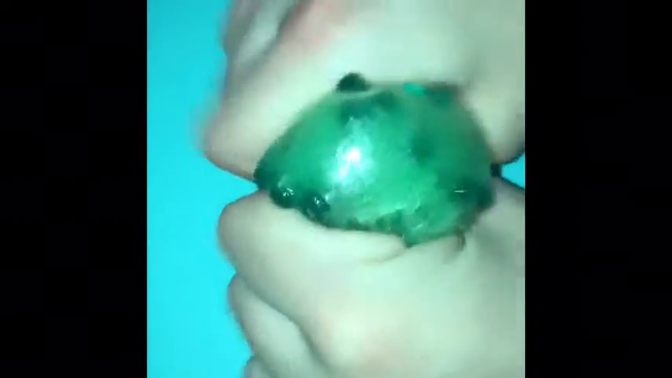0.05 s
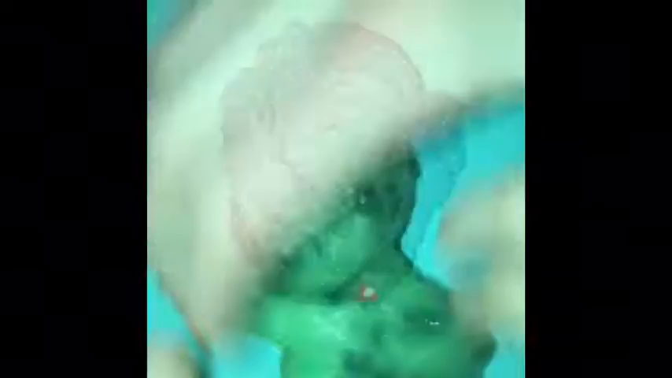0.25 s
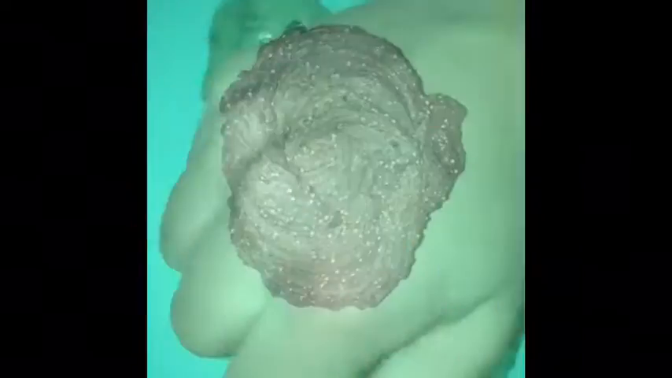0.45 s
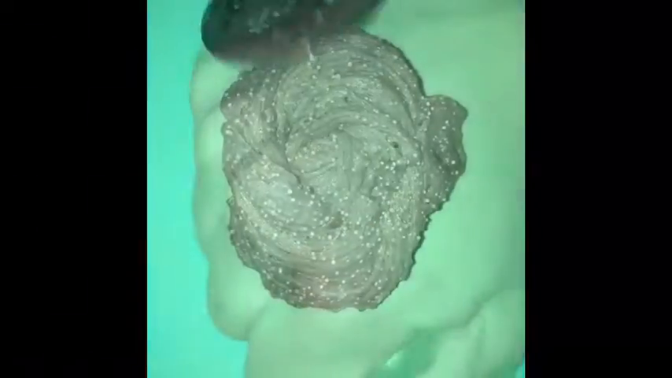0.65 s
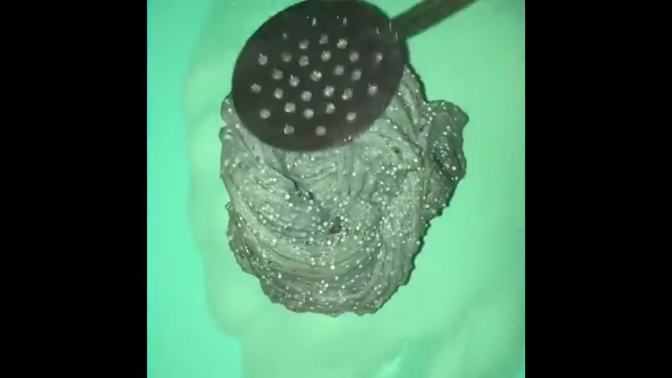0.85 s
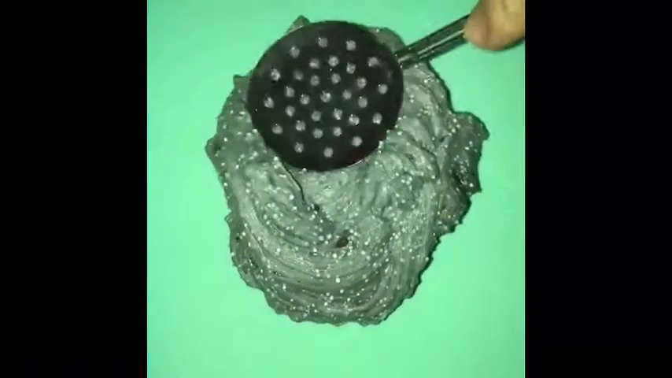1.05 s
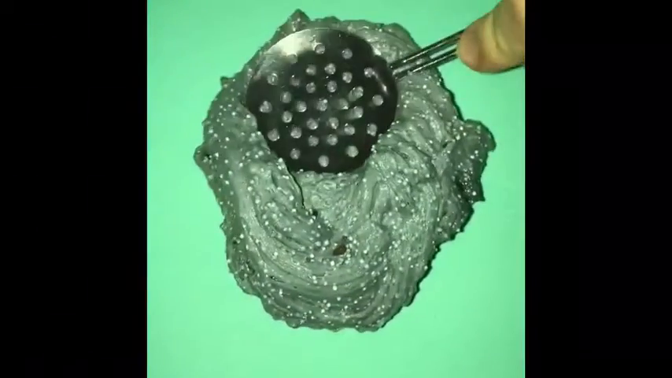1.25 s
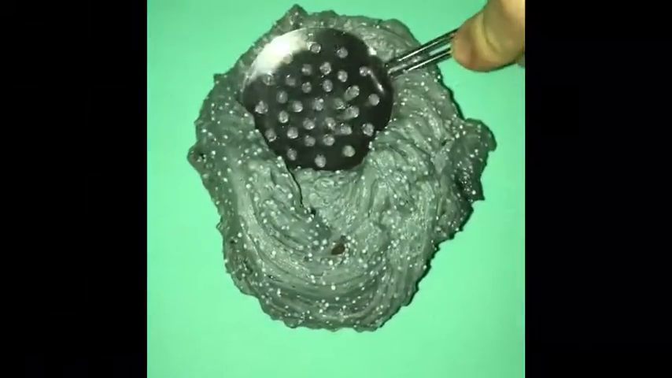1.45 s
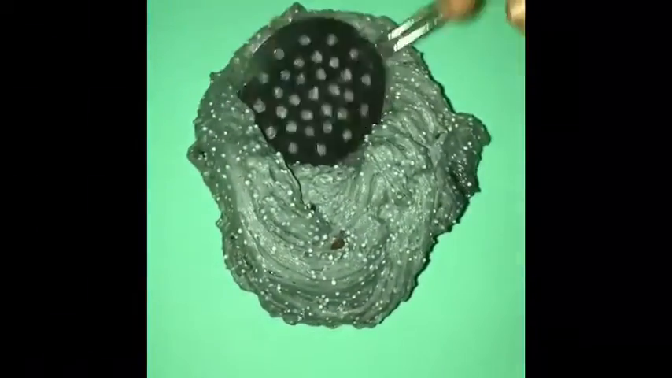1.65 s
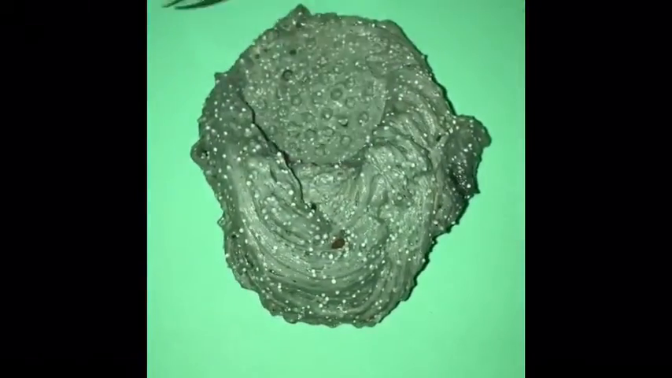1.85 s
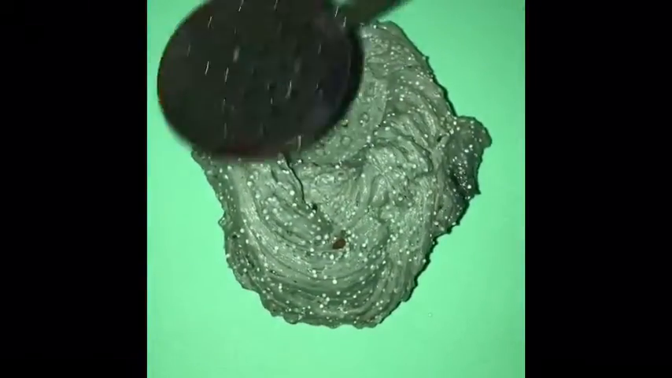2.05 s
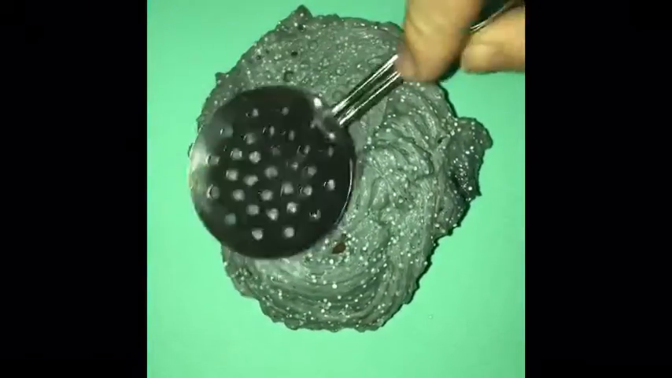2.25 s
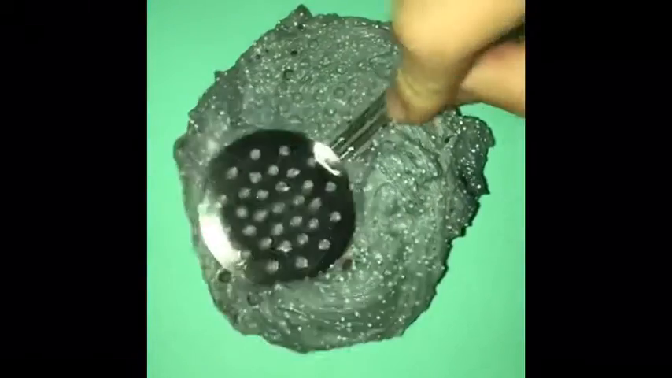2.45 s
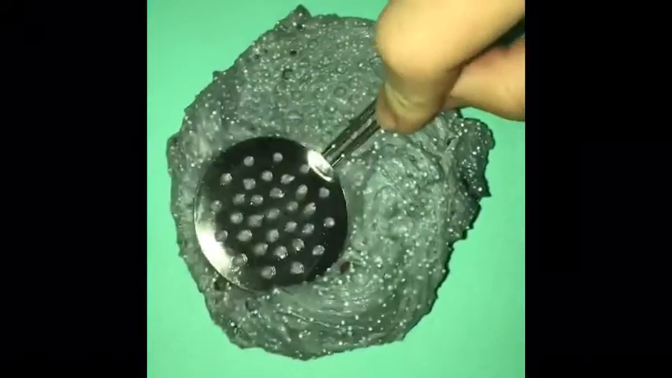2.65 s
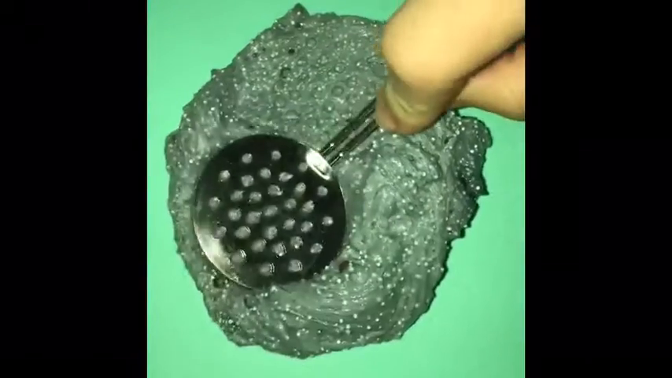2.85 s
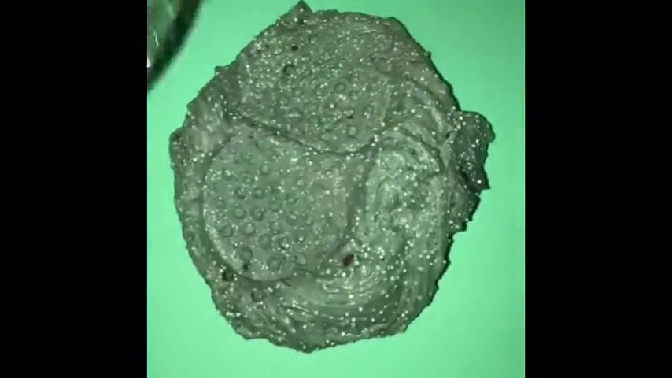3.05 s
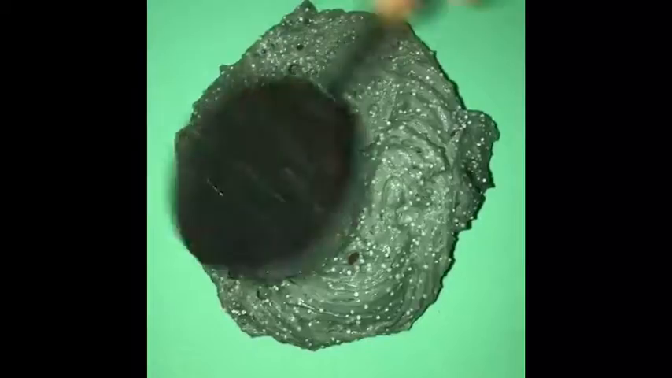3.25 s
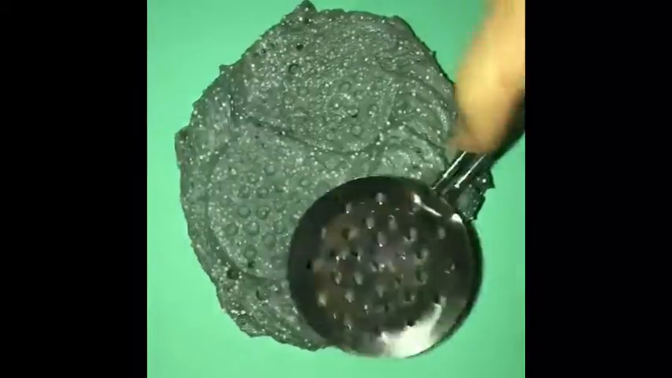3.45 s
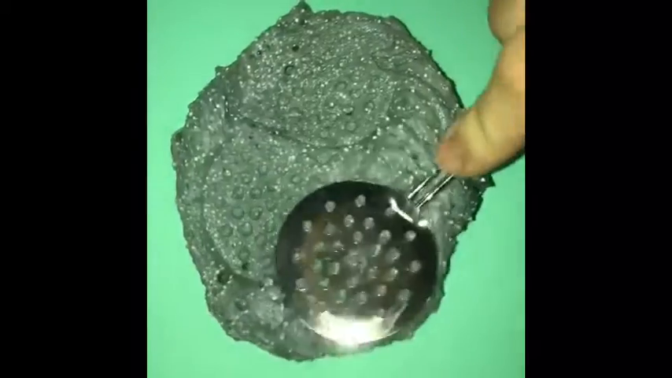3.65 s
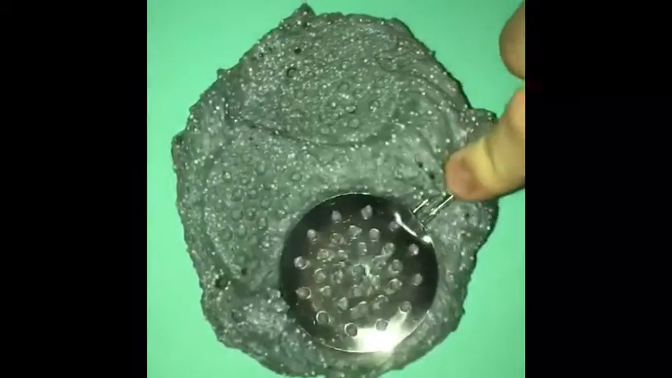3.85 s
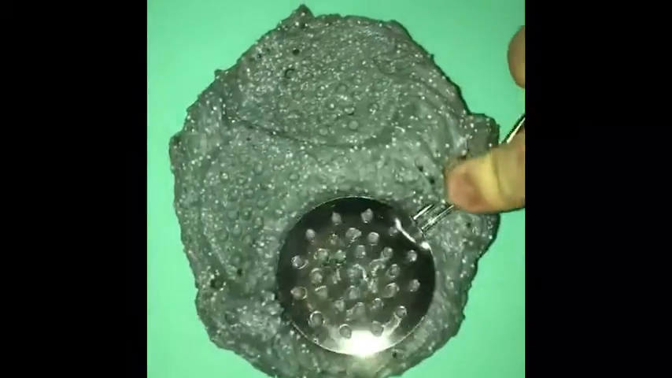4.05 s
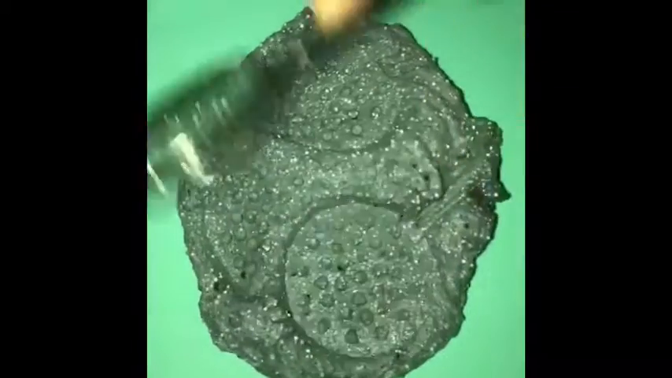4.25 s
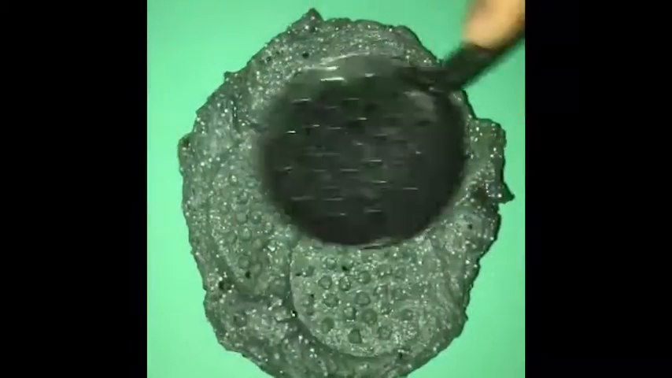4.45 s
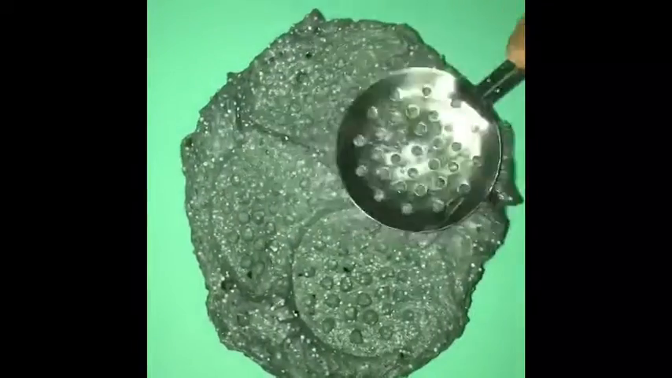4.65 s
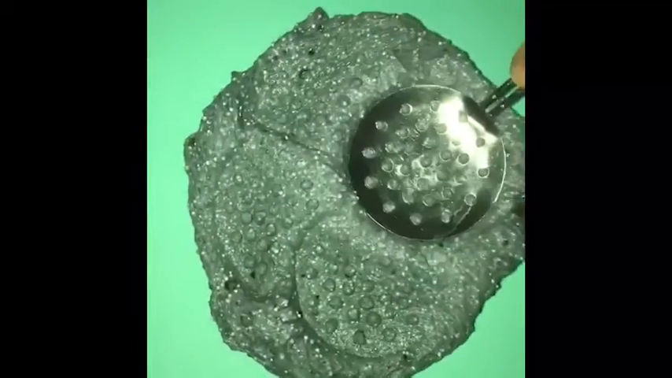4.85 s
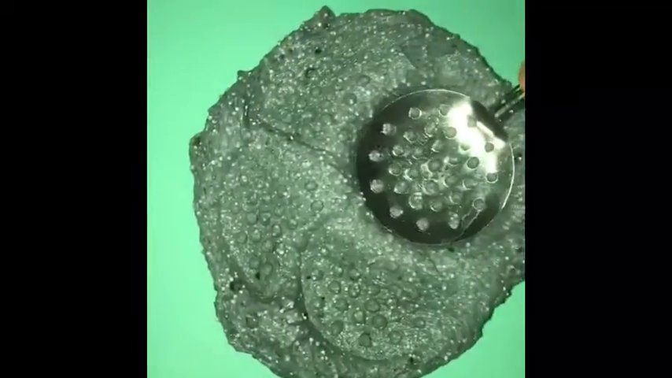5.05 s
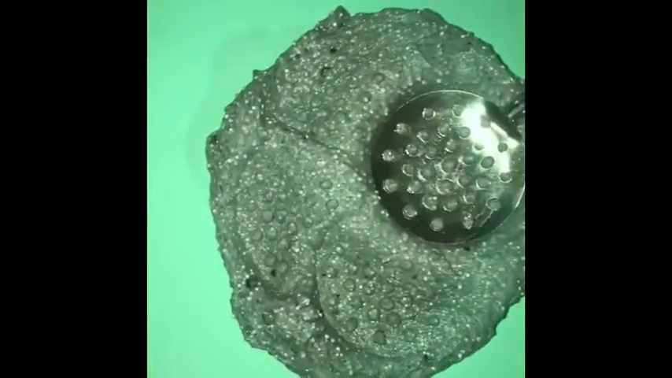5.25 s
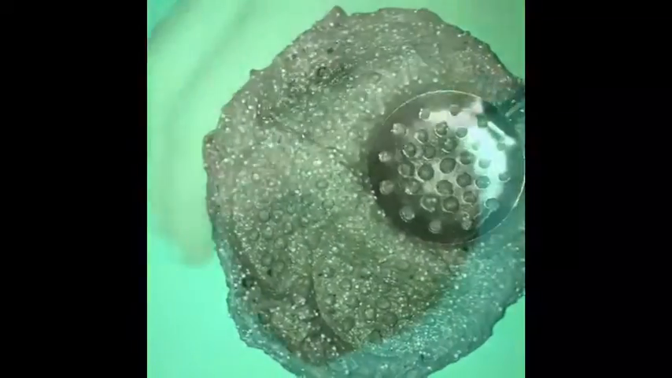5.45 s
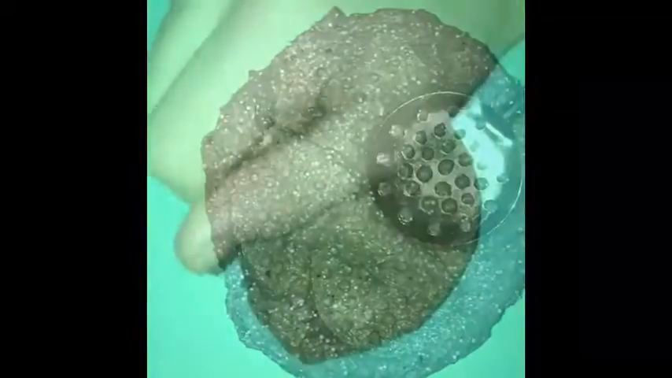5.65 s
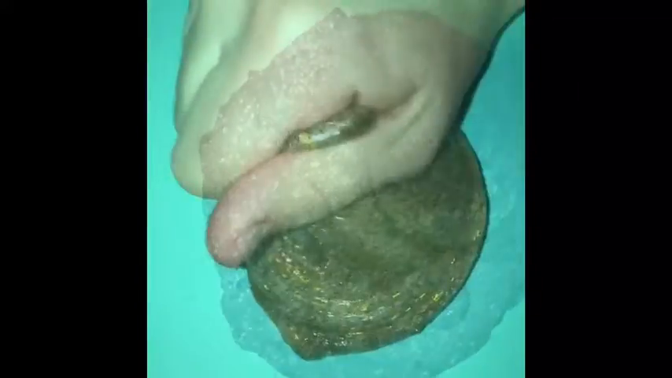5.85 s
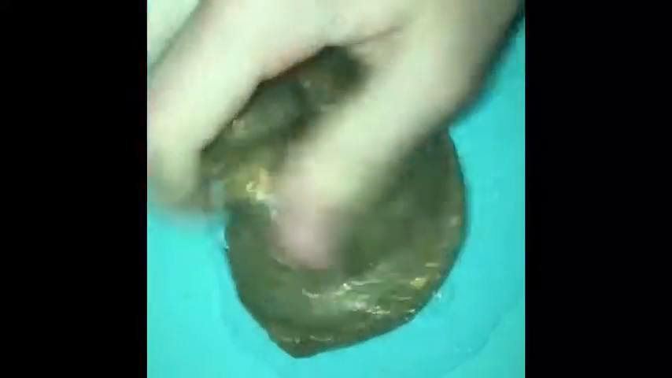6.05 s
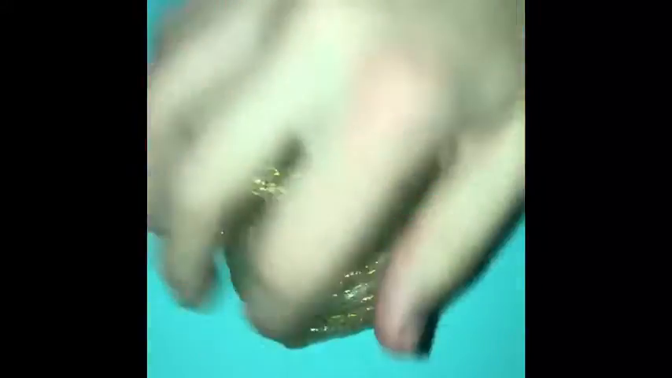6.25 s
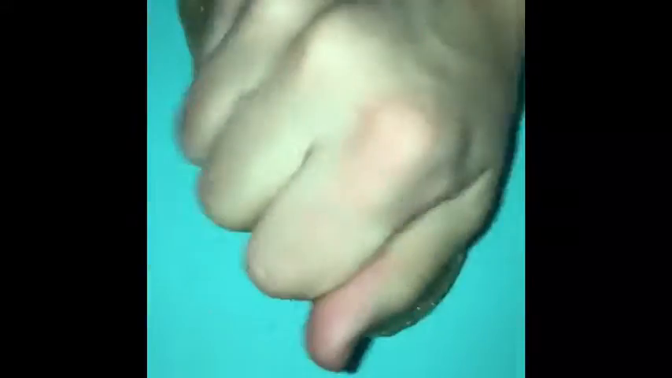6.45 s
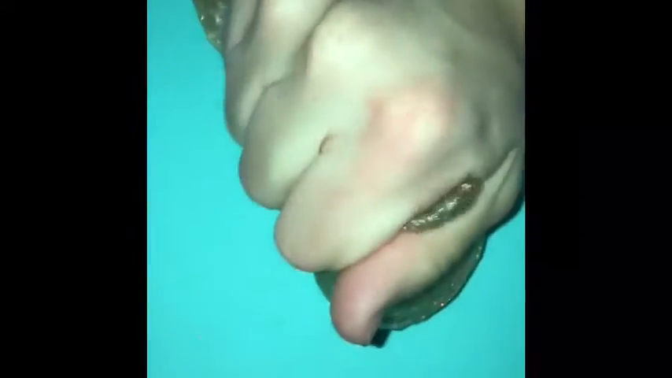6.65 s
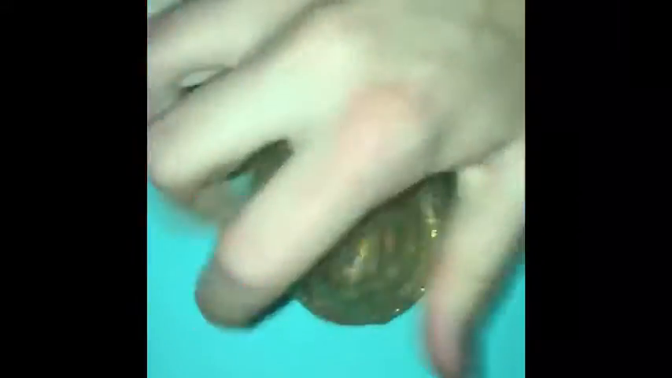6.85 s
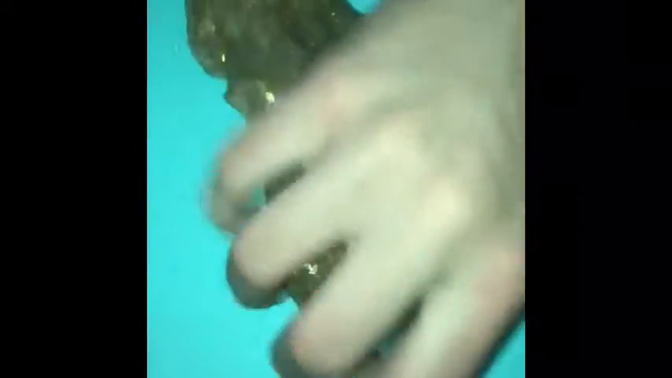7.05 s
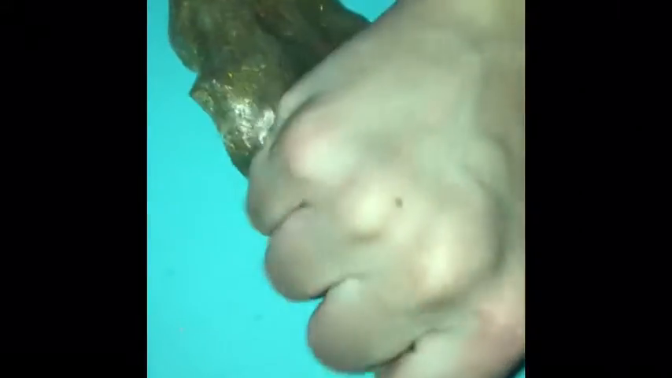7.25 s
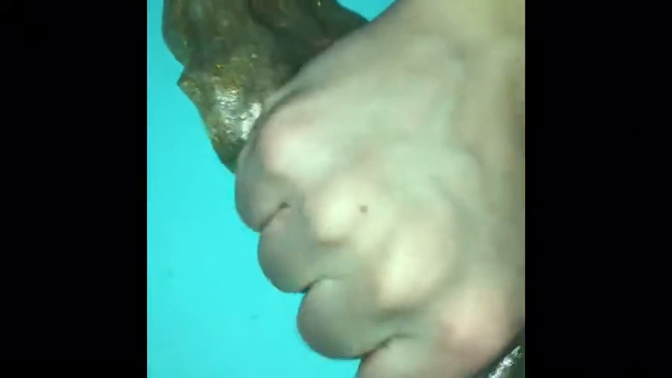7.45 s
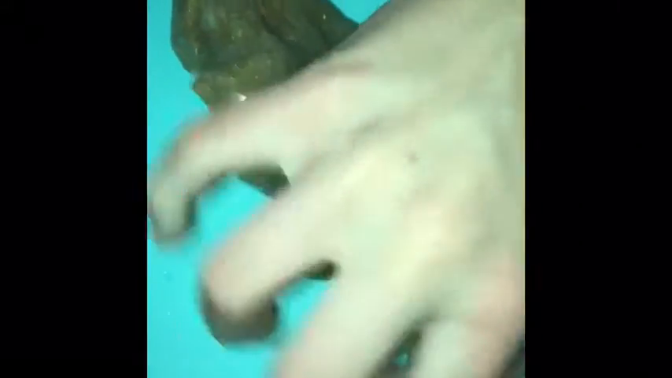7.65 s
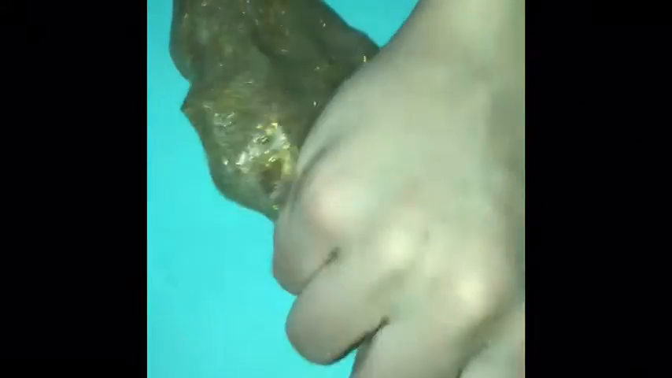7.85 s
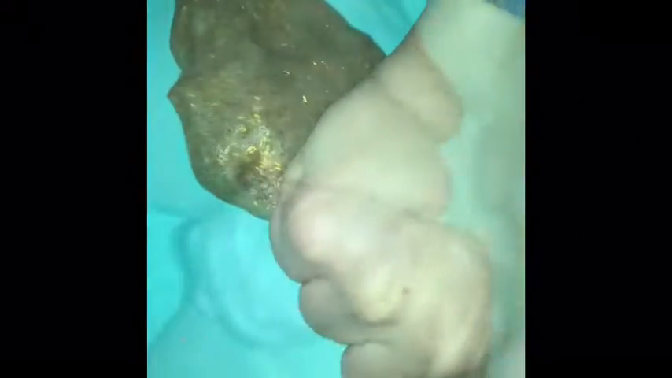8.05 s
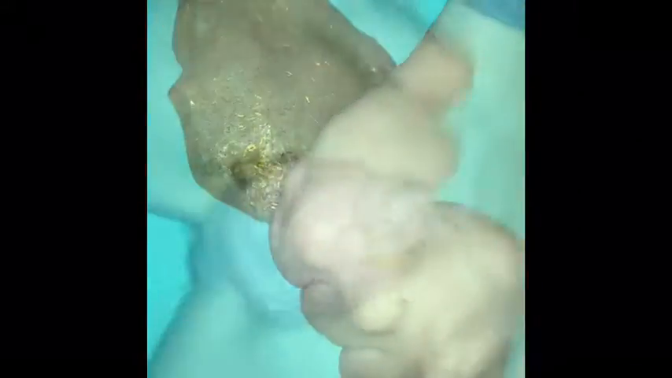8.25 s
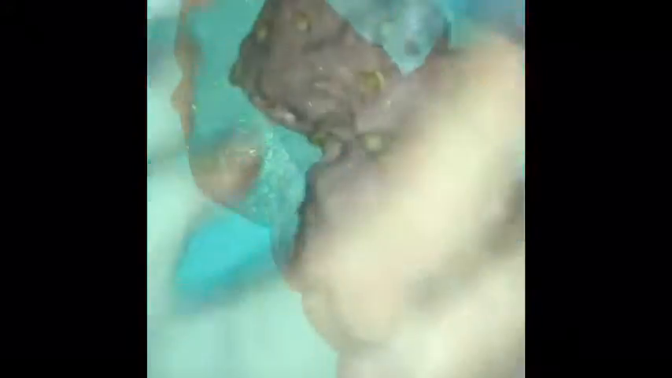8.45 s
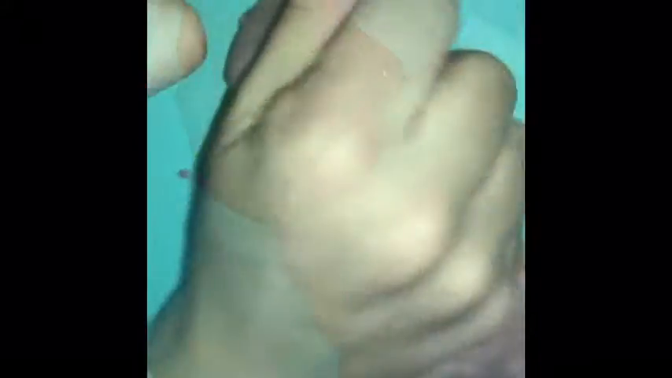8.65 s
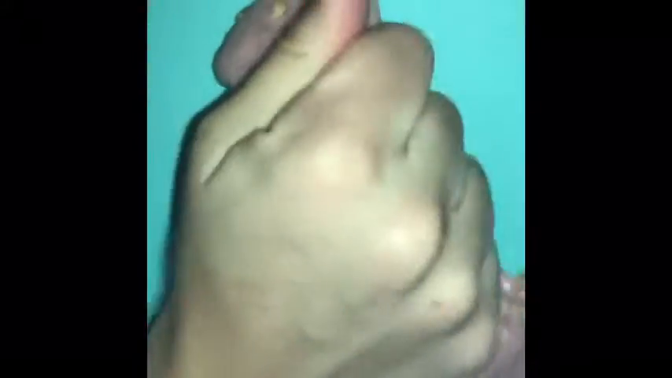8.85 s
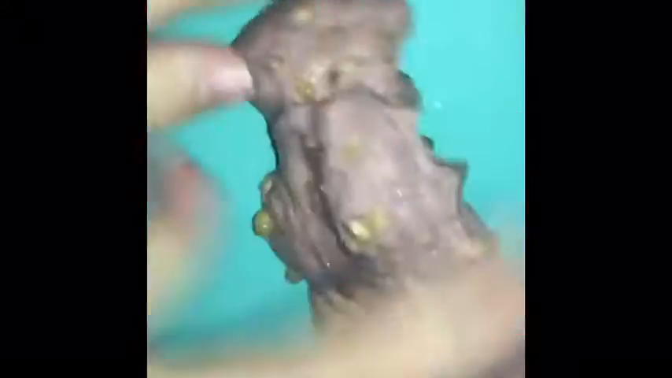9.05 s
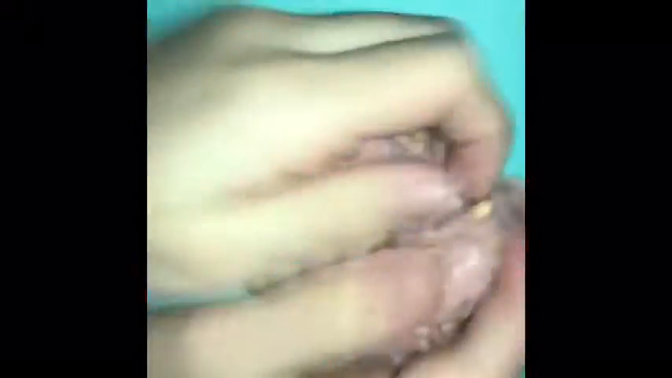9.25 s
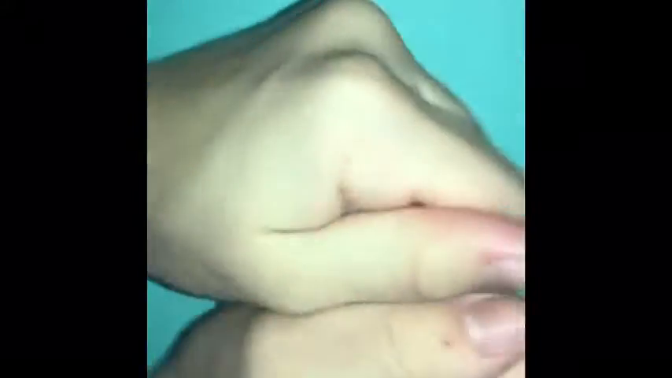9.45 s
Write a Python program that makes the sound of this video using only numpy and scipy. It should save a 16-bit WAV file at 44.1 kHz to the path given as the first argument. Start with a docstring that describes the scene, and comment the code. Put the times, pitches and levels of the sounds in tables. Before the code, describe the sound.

Very close in a small quiet room, a fist crushes bubbly slime with sharp pops and a squelch. A perforated spoon then presses in four times, each a faint fizz; the first three end in a short sticky rip and smack. Finally hands knead the slime, giving loud bunches of crisp snaps, wet squelches and low soft thuds, with quieter peeling between squeezes.

```python
"""A fist crushes crunchy slime close up, with a squelch and sharp pops, then its fingers peel off.
A perforated metal spoon is pressed in four times, then the slime is kneaded again.
Pops are short bursts of noise, fizz and crackle are crowds of tiny bursts, and squelches are sputtering air
in ringing hollows. The spoon fizzes softly as it sinks in and rips with a short smack as it is pulled off.
Low thuds and rumble of the handling and the faint air of a small, quiet room lie beneath."""
import sys
import numpy as np
from scipy import signal
from scipy.fft import rfft, irfft
from scipy.io import wavfile

SR = 44100
rng = np.random.default_rng(int(sys.argv[2]) if len(sys.argv) > 2 else 0)


def log_audio(samples):
    """Write samples as a 16-bit WAV file to the path given in sys.argv[1]."""
    # one column per channel
    frames = np.atleast_2d(samples).T
    # limit to full scale, then quantise
    limited = np.clip(frames, -1, 1)
    pcm = np.round(limited * 32767).astype(np.int16)
    wavfile.write(sys.argv[1], SR, pcm)


N = 418950
TIME = np.arange(N) / SR
EDGE_HZ = 16100  # top of the band that is kept


def amp(db):
    """Decibels to gain."""
    return 10 ** (np.asarray(db) / 20)


def unit(x):
    """Scales to rms 1."""
    return x / np.sqrt(np.mean(x ** 2) + 1e-20)


def level(rows):
    """Gain at every sample, drawn as straight lines in dB between (seconds, dB) rows."""
    return amp(np.interp(TIME, *np.transpose(rows)))


def add(mix, s, sound):
    """Mixes a sound in at time s in seconds."""
    part = mix[max(round(s * SR), 0):][:len(sound)]
    part += sound[:len(part)]


def colour(x, points):
    """Filters x by the curve through (Hz, dB) points, then scales it to rms 1."""
    hz, db = np.transpose(points)
    bins = np.fft.rfftfreq(N, 1 / SR)
    gain = amp(np.interp(np.log(bins + 1), np.log(hz), db))
    return unit(irfft(rfft(x) * gain, N))


def grains(per_s, spread_db):
    """Random tiny clicks, mostly small with a few large ones; rms 1."""
    size = amp(spread_db * np.minimum(rng.exponential(1, N), 4.5))
    sign = rng.choice([-1, 1], N)
    present = rng.random(N) < per_s / SR
    return unit(size * sign * present)


def swell(start, peak, end, ends_db, shape):
    """Gain that is 1 at the peak and normally ends_db lower at start and end, with faint tails beyond."""
    before = (peak - TIME) / max(peak - start, .002)
    after = (TIME - peak) / max(end - peak, .002)
    away = np.maximum(before, after)
    return amp(-ends_db * away ** shape) * (away < 2)


def cavity(x, hz, width_hz):
    """A soft hollow ringing at hz (which may glide), with steep skirts; rms 1."""
    turn = np.exp(2j * np.pi * np.cumsum(hz * np.ones(len(x))) / SR)
    # shift the ringing pitch down to zero, smooth, then shift it back up
    smooth = signal.lfilter(*signal.butter(2, width_hz / 2, fs=SR), x / turn)
    return unit((turn * smooth).real)


def burst(hz, tear_ms, ragged, ring_ms, ring_db, build=0.16, size=1024):
    """One bubble: the film starts to tear, snaps after 1 ms, and the open pocket rings for a moment."""
    ms = (np.arange(size) - SR // 1000) / SR * 1000  # the snap is at zero
    tear, scatter = rng.standard_normal((2, size))
    torn = 1 - np.exp(-ragged * tear_ms)  # quick bursts are nearly all snap
    tear = tear * np.exp(-(ms / tear_ms / np.where(ms < 0, build, 1)) ** 2)
    snap = unit(1. * (ms == 0))
    drive = np.sqrt(1 - torn) * snap + np.sqrt(torn) * unit(tear)
    # the open pocket rings at four scattered pitches, roughened by noise
    modes = np.minimum(hz * np.exp(.55 * rng.standard_normal(size=(4, 1))), EDGE_HZ)
    ring = unit(np.sin(2 * np.pi * modes * TIME[:size]).sum(0)) + scatter
    drive += amp(ring_db) * unit(ring * np.exp(-ms / ring_ms) * (ms > 0))
    # each bubble colours its burst with a broad band around hz
    bins = abs(np.fft.fftfreq(size, 1 / SR)) + 20
    log_gain = 0.88 * np.log(bins / hz)
    log_gain -= .5 * np.log(1 + (bins / hz) ** 5)
    log_gain -= np.log(1 + (bins / EDGE_HZ) ** 20)
    band = np.exp(np.conj(signal.hilbert(log_gain)))  # minimum phase: the band adds no sound ahead of the drive
    return unit(np.fft.ifft(np.fft.fft(drive) * band).real) / np.sqrt(ms[-1])


# The colour of the room's own air. Each row: frequency in Hz, relative strength in dB.
AIR_COLOUR = [(20, -31), (40, -16.5), (56, 3), (80, -4), (130, -12), (300, -15), (600, -21.5),
              (2000, -28.5), (8000, -39.5), (16000, -35)]


def room_air(db=-63.5):
    """The steady, faint noise of the quiet room."""
    return amp(db) * colour(rng.standard_normal(N), AIR_COLOUR)


# How strongly the hands shift the mass on the table. Each row: time in seconds, level in dB.
HANDLING_LEVEL = [(0, -62.5), (.7, -75), (1, -74.5), (5.5, -76), (6.1, -56), (8.6, -60.5), (9.5, -52)]
# The colour of low pushes and thuds. Each row: frequency in Hz, relative strength in dB.
PUSH_COLOUR = [(20, -42), (64, -3), (120, -2.5), (280, -3.5), (500, -10), (1200, -32)]


def handling(thuds):
    """Low noise as the hands move the mass, and as lifted slime drops back."""
    return (level(HANDLING_LEVEL) + thuds) * colour(rng.standard_normal(N), PUSH_COLOUR)


# Air pushed through a fold. Each row: start, peak and end in seconds, level in dB, cavity pitch in Hz,
# pitch glide in octaves to either side of the peak, level of the low push in dB before its 2 dB cut.
FOLD_SQUELCHES = [(0, 0.003, 0.051, -36.5, 1890, -0.13, -68),
                  (0.173, 0.218, .32, -34.5, 1390, 0.00069, -47.5),
                  (0.514, 0.523, 0.56, -35, 1500, 0.044, -57), (0.6, .614, 0.65, -42.5, 2500, -0.14, -69),
                  (5.574, 5.65, 5.82, -52.5, 1350, .2, -62), (5.82, 5.818, 5.91, -31, 1700, 0.089, -52),
                  (5.84, 5.942, 6.06, -51, 1090, 0.18, -54), (6.201, 6.219, 6.28, -36, 1380, 0.074, -45),
                  (6.445, 6.45, 6.55, -50.5, 1200, -0.12, -48), (6.562, 6.579, 6.66, -26, 740, 0.15, -58),
                  (6.615, 6.623, 6.67, -37, 1090, -0.15, -50), (6.728, 6.735, 6.77, -36, 1130, -0, -41.5),
                  (6.884, 6.954, 7.19, -41.5, 1030, 0.096, -44.5),
                  (7.205, 7.245, 7.277, -26, 1340, .08, -52),
                  (7.234, 7.246, 7.32, -27.5, 4001, -0.053, -57),
                  (7.327, 7.366, 7.5, -34.5, 1920, 0.12, -47),
                  (7.657, 7.736, 7.79, -35.5, 1341, 0.77, -46.5),
                  (7.86, 7.873, 7.9, -33, 1339, -0.06, -35.5), (7.875, 7.93, 8.06, -37, 1260, -0.094, -64),
                  (7.985, 8.08, 8.28, -42.5, 2340, 0.22, -50.5), (8.31, 8.45, 8.52, -42.5, 1260, 0.44, -51),
                  (8.693, 8.797, 8.85, -37.5, 770, 0.074, -46), (8.97, 9.055, 9.17, -50.5, 1310, 0.19, -51),
                  (9.153, 9.205, 9.24, -38, 1550, -.35, -42.5), (9.208, 9.334, 9.55, -45.5, 1414, 0.2, -51)]
# The colour of a rustling fold. Each row: frequency in Hz, relative strength in dB.
FOLD_COLOUR = [(100, -33), (450, -5.5), (1000, 5), (2400, -4.5), (4000, -14.5), (12000, -36.5)]
SUCK_LEAD_S, SUCK_LAG_S, SUCK_END_S = 0.013, 0.0066, 0.068  # air rushes in under the spoon
SUCK_PUSH_DB = -19.5  # push of that air relative to the hollow, before the same cut


def squelches(width_hz=300, widening=.17, cavity_db=-2, upper_db=-15, fold_db=-8, push_db=-2,
              suck_glide=0.19, wobble=0.15, wobble_s=.009):
    """Sputtering air rings each fold, or the hollow under the spoon, as the mass thuds; also gives the airflow."""
    out, flow = np.zeros((2, N))
    sputter = grains(per_s=3000, spread_db=4.0)
    rustle = colour(grains(per_s=3000, spread_db=6.5), FOLD_COLOUR)
    push = colour(rng.standard_normal(N), PUSH_COLOUR)
    # the soft walls shake, so the pitch wavers
    drift = signal.fftconvolve(rng.standard_normal(N), np.hanning(int(2 * wobble_s * SR)), "same")
    trembling = 2 ** (wobble * unit(drift))
    sucks = [(s - SUCK_LEAD_S, s + SUCK_LAG_S, s + SUCK_END_S, db, hz, suck_glide, db + SUCK_PUSH_DB)
             for s, _, _, db, hz, _ in SPOON_PULLS]
    for start, peak, end, db, hz, glide, low_db in FOLD_SQUELCHES + sucks:
        air = swell(start, peak, end, ends_db=18.0, shape=1.4)
        now = air > 0
        # the pitch glides as the cavity shrinks or opens
        progress = np.tanh(2 * (TIME[now] - peak) / (end - start))
        pitch = hz * trembling[now] * 2 ** (glide * progress)
        third = 3 * pitch  # closed at one end, it also rings three times higher
        width = width_hz + widening * hz  # soft walls damp it heavily
        hollow = amp(cavity_db) * cavity(sputter[now], pitch, width)
        hollow += amp(upper_db) * cavity(sputter[now], third, 2 * width)
        fold = amp(db) * (hollow + amp(fold_db) * rustle[now])
        out[now] += air[now] * (fold + amp(low_db + push_db) * push[now])
        flow += air * amp(db)
    return out, flow


# The fist closes and crushes the foam. Each row: start, peak and end in seconds, crushing level in dB.
FIST_SQUEEZES = [(0, 0.014, .06, -37), (0.598, .7, 0.83, -53), (5.7, 5.83, 5.85, -42),
                 (5.888, 5.905, 6.04, -43.5), (6.515, 6.64, 6.78, -36), (7.306, 7.383, 7.553, -39),
                 (7.98, 8.12, 8.34, -39.5), (8.683, 8.835, 8.97, -37.5), (9.43, 9.5, 12.4, -39.5)]


def squeezing():
    """Crushing of the foam as the fist tightens and relaxes."""
    return sum(amp(db) * swell(start, peak, end, ends_db=17.5, shape=1.7)
               for start, peak, end, db in FIST_SQUEEZES)


# The foam keeps fizzing faintly as it settles. Each row: time in seconds, level in dB.
SETTLING_LEVEL = [(0, -55), (.9, -71.5), (2.1, -81), (4.27, -82.5), (4.33, -65), (4.68, -63.5), (4.8, -77),
                  (5.57, -76), (5.7, -72), (6.4, -69), (7.1, -64), (9.5, -73)]


def settling():
    """A faint, slowly changing fizz level between the louder events."""
    return level(SETTLING_LEVEL)


# The colour of crisp fizz. Each row: frequency in Hz, relative strength in dB.
CRISP_COLOUR = [(150, -29.5), (600, -10), (1200, -4.5), (2500, -6.5), (6000, -1.5), (9000, -1), (10500, -4),
                (12200, 1.5), (16000, -2.5)]
# The colour of dull, wet fizz. Each row: frequency in Hz, relative strength in dB.
DULL_COLOUR = [(150, -24), (600, -11), (1500, 3), (3900, 4), (6000, -2.5), (9000, -13), (16000, -20)]


def fizz(crush, flow, dry_db=0.5, wet_db=0):
    """Thousands of tiny bubbles: crisp under plain pressure, duller inside a squelching fold."""
    wet = flow ** 2 / (flow ** 2 + (1.37 * crush) ** 2)  # share of dull fizz, 0 to 1
    crisp = colour(grains(per_s=6200, spread_db=4.5), CRISP_COLOUR)
    dull = colour(grains(per_s=6000, spread_db=2.5), DULL_COLOUR)
    return crush * (amp(dry_db) * np.sqrt(1 - wet) * crisp + amp(wet_db) * np.sqrt(wet) * dull)


def crackle(crush, per_s, gain_db, spread_db, low_hz=2600, high_hz=16000, count=64):
    """Smaller bubbles burst at random, louder the harder the foam is being crushed."""
    out = np.zeros(N)
    bubbles = [burst(hz, tear_ms=0.45, ragged=2, ring_ms=1.1, ring_db=-7.5, build=.5)
               for hz in np.geomspace(low_hz, high_hz, count)]
    for when, large, which in rng.random(size=(3000, 3))[:int(per_s * N / SR)]:
        db = gain_db + spread_db * min(-np.log(1 - large), 3)
        bubble = bubbles[int(which * count)]
        add(out, when * N / SR, crush[int(when * N)] * amp(db) * bubble)
    return out


def pop(db, hz, tear_cycles=7.44):
    """A large bubble; the duller, larger ones tear for longer."""
    tear_ms = 1000 * tear_cycles / (hz + 1000) * np.exp(rng.uniform(-.4, .4))
    return amp(db) * burst(hz, tear_ms, ragged=2.27, ring_ms=2.6, ring_db=-7.0)


# Bubbles loud enough to stand out. Each row: time of the snap in seconds, level in dB before pops()
# lifts it by 1 dB, frequency in Hz around which the burst is brightest.
LOUD_BUBBLES = [(0.004, -22.5, 12900), (0.0146, -19, 13500), (0.026, -11, 17450), (0.033, -16.5, 15900),
                (0.5587, -36.5, 1850), (0.624, -41.5, 2380), (0.6836, -17.5, 3090), (0.6889, -18.5, 13000),
                (0.7123, -36, 3000), (0.739, -29.5, 2830), (0.754, -30, 10000), (0.7763, -38.5, 2270),
                (0.9142, -33, 13100), (0.944, -40.5, 3460), (1.8143, -32, 6130), (2.6718, -41.5, 8050),
                (3.113, -24.5, 3110), (4.2195, -46, 12700), (4.2849, -17.5, 11500), (4.8707, -37, 2230),
                (5.0038, -38, 9100), (5.35, -53, 2520), (5.425, -50, 5400), (5.618, -26.5, 12230),
                (5.7423, -17, 6100), (5.7954, -15.5, 6860), (5.8, -19, 9000), (5.824, -12.5, 4540),
                (5.8895, -12, 5850), (5.9002, -24, 8540), (5.911, -14.5, 9970), (5.9609, -23, 14600),
                (5.9848, -20, 15450), (5.99, -23.5, 16600), (6.4384, -41, 3000), (6.4939, -28.5, 2730),
                (6.5053, -28, 8900), (6.5179, -19.5, 16500), (6.5491, -15.5, 10030), (6.5803, -15.5, 1330),
                (6.596, -18, 7560), (6.608, -13.5, 6300), (6.6298, -7.5, 6040), (6.64, -6.5, 8870),
                (6.66, -19.5, 6500), (6.6691, -14.5, 14800), (6.679, -10.5, 9650), (6.7155, -18, 11430),
                (6.7287, -14.5, 8380), (6.7952, -23.5, 9910), (6.9171, -22.5, 1610), (7.149, -41.5, 1940),
                (7.31, -12, 1370), (7.345, -10.5, 1920), (7.3215, -20.5, 5200), (7.3561, -13.5, 5670),
                (7.368, -15.5, 7200), (7.3898, -7.5, 3430), (7.378, -23.5, 3200), (7.439, -13, 16400),
                (7.413, -23, 11400), (7.4841, -18.5, 15750), (7.513, -28.5, 4960), (7.637, -22.5, 5260),
                (7.9712, -28, 2550), (8.0169, -27, 2450), (8.067, -24.5, 3840), (8.0795, -18.5, 10800),
                (8.1147, -7, 5030), (8.1338, -16, 11090), (8.1573, -20, 6770), (8.2517, -20.5, 4150),
                (8.3865, -25.5, 11560), (8.55, -37.5, 15800), (8.7146, -18, 4790), (8.7345, -20, 5850),
                (8.7529, -19, 5400), (8.7627, -14, 5420), (8.779, -23, 5090), (8.7983, -13, 11340),
                (8.822, -9, 8500), (8.8328, -6.5, 6200), (8.855, -8, 16200), (8.8846, -7.5, 16000),
                (8.9047, -15, 15800), (8.9524, -15.5, 15700), (9.033, -30, 6324), (9.3134, -24.5, 3666),
                (9.4197, -24.5, 3870), (9.4758, -13.5, 6540)]


def pops(gain_db=1, neighbour_db=-13.5, neighbour_s=.0058, neighbour_pitch=1.25):
    """Each large bubble sets off a smaller neighbour a few milliseconds later."""
    out = np.zeros(N)
    for s, db, hz in LOUD_BUBBLES:
        start = s - .001  # the film tears for 1 ms before the snap
        add(out, start, pop(db + gain_db, hz))
        neighbour_start = start + neighbour_s * rng.uniform(.75, 1.25)
        add(out, neighbour_start, pop(db + neighbour_db, hz * neighbour_pitch))
    return out


def shaken(below_db=-24, fade_s=0.02):
    """Each large pop shakes the foam around it, which fizzes for a moment."""
    kicks = np.zeros(N)
    for s, db, _ in LOUD_BUBBLES:
        kicks[round(s * SR)] += amp(db + below_db) ** 2
    return np.sqrt(signal.lfilter([1], [1, -np.exp(-2 / (fade_s * SR))], kicks + 1e-20))


# The fingers peel off the sticky mass to take a new grip.
# Each row: start, peak and end in seconds, tearing level in dB.
FINGER_PEELS = [(0.177, 0.223, 0.33, -37.5), (6.103, 6.172, 6.235, -37.5), (6.886, 6.958, 7.01, -39),
                (7.222, 7.24, 7.285, -35), (7.635, 7.712, 7.75, -39), (7.866, 7.868, 8.04, -41),
                (8.29, 8.405, 8.54, -43.5), (8.95, 9.04, 9.2, -47.5), (9.148, 9.25, 9.8, -46)]


def peeling():
    """Tearing of the foam as the fingers come away."""
    return sum(amp(db) * swell(start, peak, end, ends_db=22, shape=1.71)
               for start, peak, end, db in FINGER_PEELS)


# The spoon sinks in. Each row: first touch and hardest push in seconds, level in dB at the hardest push,
# fade afterwards in dB per second.
SPOON_PRESSES = [(0.959, 1.07, -51.5, 40), (2.343, 2.486, -50, 70), (3.633, 3.817, -49, 62),
                 (4.712, 4.803, -53, 37)]
TOUCH_DB = -5.5  # fizz at first touch, relative to the hardest push


def pressing():
    """The fizz starts as the spoon touches, grows with the push and dies away as the slime yields."""
    out = np.zeros(N)
    for touch, push, db, fade in SPOON_PRESSES:
        growing_db = TOUCH_DB * (push - TIME) / (push - touch)
        fading_db = -fade * (TIME - push)
        out += amp(db + np.minimum(growing_db, fading_db)) * (TIME > touch)
    return out


# The spoon is pulled off. Each row: time the slime gives way in seconds, length of the rip in seconds,
# ripping level in dB, level of the hollow under the spoon in dB, hollow pitch in Hz, thud level in dB.
SPOON_PULLS = [(1.8127, 0.031, -34, -39.5, 780, -54), (3.112, 0.022, -31, -34.5, 951, -40.5),
               (4.284, 0.041, -36.5, -38.5, 890, -43.5)]
STRETCH_DB, STRETCH_S = -6, .010  # the stretched slime fizzes more and more before it gives way
RIP_FADE_DB = -6  # then it rips across the spoon, fading by this much, and stops


def pulling(cusp=0.67):
    """The slime stretches under the lifted spoon, then rips off it."""
    out = np.zeros(N)
    for s, length, db, *_ in SPOON_PULLS:
        stretch = amp(STRETCH_DB) * np.exp(-(abs(TIME - s) / STRETCH_S) ** cusp)
        rip = amp(RIP_FADE_DB * abs(TIME - s) / length) * (TIME < s + length)
        out += amp(db) * np.where(TIME < s, stretch, rip)
    return out


def dropping(lag_s=0.022, end_s=0.084):
    """Thud levels as the lifted slime drops back on the table after each pull."""
    return sum(amp(db) * swell(s, s + lag_s, s + end_s, ends_db=16, shape=1.1)
               for s, *_, db in SPOON_PULLS)


# Large air pockets that ring as they open. Each row: start in seconds, level of the tone in dB,
# starting pitch in Hz, time to fade by 60 dB in seconds.
AIR_POCKETS = [(5.822, -23, 288, 0.036), (6.013, -27, 1106, 0.035), (6.58, -23.5, 872, 0.05),
               (6.733, -28.5, 1213, 0.06), (7.184, -32, 1240, 0.035), (8.765, -22.5, 333, 0.028),
               (9.4, -30, 1175, 0.032), (9.478, -28, 323.4, 0.028)]


def gulps(rise=0.14, flutter=0.49, width=0.77):
    """Damped tones that rise as the pocket opens, blurred by its fluttering skin."""
    out, t = np.zeros(N), TIME[:SR // 10]
    for s, db, hz, t60 in AIR_POCKETS:
        tone = np.sin(2 * np.pi * hz * t * (1 + rise * t / t60))
        skin = cavity(rng.standard_normal(len(t)), hz, width * hz)
        fade = np.exp(-np.log(1000) * t / t60)
        add(out, s, amp(db) * fade * (tone + flutter * skin))
    return out


def squeak(s=6.836, length=0.026, from_hz=10800, to_hz=14800, db=-47):
    """A pinhole of air whistles upward."""
    t = np.arange(0, length, 1 / SR)
    out = np.zeros(N)
    add(out, s, amp(db) * np.hanning(len(t)) * signal.chirp(t, from_hz, length, to_hz))
    return out


def room(x, t60=0.26, wet_db=-21):
    """The faint, short tail of a small room, made of sparse random echoes that die away."""
    t = TIME[:SR // 2]
    sparse = rng.standard_normal(len(t)) * (rng.random(len(t)) < .2)
    taps = sparse * np.exp(-np.log(1000) * t / t60) * (t > .004)
    return x + amp(wet_db) * signal.fftconvolve(x, taps / np.linalg.norm(taps))[:N]


def scene(fist_fizz_db=-6.0):
    """Slime in the room, over the thuds and rumble of the handling and the room's own air."""
    fist = squeezing()
    gentle = peeling() + pressing() + pulling() + settling()
    crush = np.sqrt((amp(fist_fizz_db) * fist) ** 2 + gentle ** 2 + shaken() ** 2)
    folds, flow = squelches()
    bubbles = crackle(fist, per_s=120, gain_db=7, spread_db=4)
    bubbles += crackle(gentle, per_s=130, gain_db=-5.5, spread_db=4.5)
    slime = pops() + gulps() + folds + fizz(crush, flow) + squeak() + bubbles
    return (room(slime) + handling(dropping()) + room_air())[None]


def record(dry):
    """The loudest snaps saturate softly; then a low-pass filter limits the band."""
    low_pass = signal.firwin(255, EDGE_HZ, window=("kaiser", 8), fs=SR)
    return signal.oaconvolve(np.tanh(dry), low_pass[None], "same")


dry = scene()
out = record(dry)
log_audio(out)
```